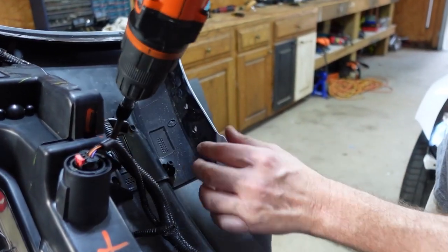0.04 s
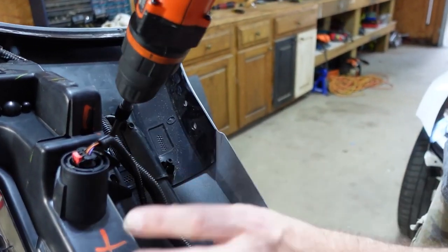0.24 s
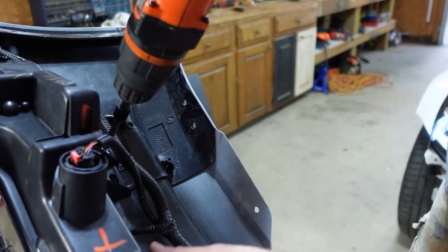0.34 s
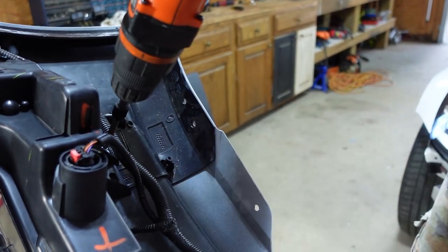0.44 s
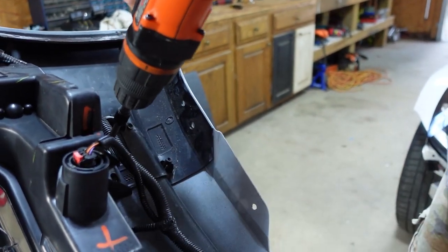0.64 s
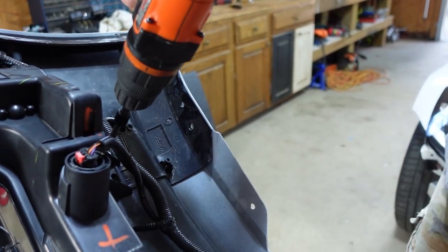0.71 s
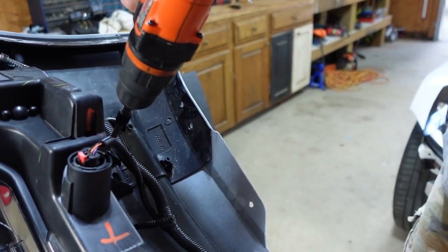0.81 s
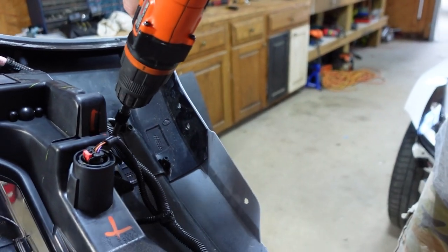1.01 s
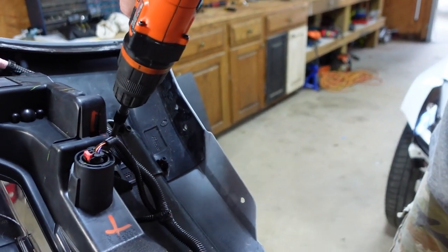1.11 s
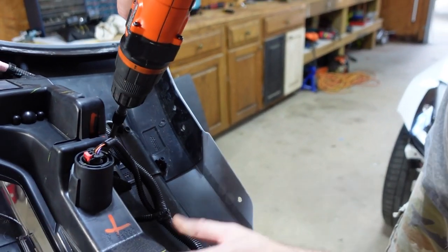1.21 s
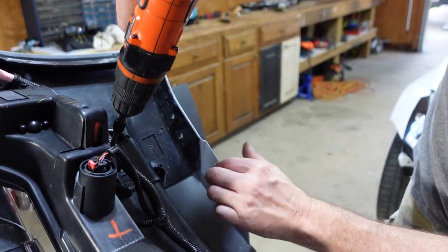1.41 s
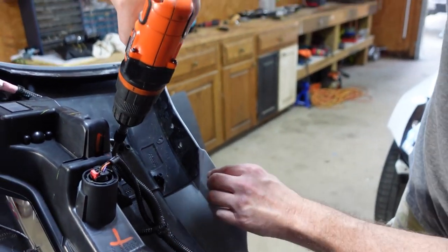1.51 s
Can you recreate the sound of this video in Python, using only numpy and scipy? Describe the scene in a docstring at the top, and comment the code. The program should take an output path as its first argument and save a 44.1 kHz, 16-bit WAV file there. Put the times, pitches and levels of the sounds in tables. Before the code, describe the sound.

A cordless drill whirs in three short bursts, close up in a garage and louder on the left. The bit clicks in the screw head, and a plastic panel knocks and groans as the screw tightens.

```python
"""A cordless drill drives a screw into a plastic fairing in three short trigger pulls.
Close up in a garage, much louder in the left channel, over faint room air. The gearbox rattles, the
brushes hiss, and the whine sweeps through a housing resonance as the motor spins up and brakes.
The bit clicks in the screw head, the panel knocks and groans as the screw tightens,
and a hand lands on it at the end."""
import sys
import numpy as np
from scipy import signal
from scipy.fft import rfft, irfft
from scipy.io import wavfile
from scipy.ndimage import uniform_filter1d

SR = 44100
rng = np.random.default_rng(int(sys.argv[2]) if len(sys.argv) > 2 else 0)


def log_audio(samples):
    """Write samples as a 16-bit WAV file to the path given in sys.argv[1]."""
    # one column per channel
    frames = np.atleast_2d(samples).T
    # limit to full scale, then quantise
    limited = np.clip(frames, -1, 1)
    pcm = np.round(limited * 32767).astype(np.int16)
    wavfile.write(sys.argv[1], SR, pcm)


N = 68355
T = np.arange(N) / SR


def undb(db):
    """Decibels to gain."""
    return 10 ** (np.asarray(db) / 20)


def unit(x):
    """Scale to rms 1."""
    return x / np.sqrt(np.mean(x ** 2) + 1e-18)


def colour(x, spectrum):
    """Minimum-phase filter of unit power gain, shaped by rows of f/Hz, level/dB."""
    hz, db = np.array(spectrum, float).T
    size = 4096
    log_hz = np.log(np.arange(size // 2 + 1) * SR / size + 1)
    gain = unit(undb(np.interp(log_hz, np.log(hz), db)))
    cepstrum = irfft(np.log(gain))
    cepstrum[1:size // 2] *= 2
    cepstrum[size // 2 + 1:] = 0
    return signal.fftconvolve(x, irfft(np.exp(rfft(cepstrum))))[:len(x)]


def resonate(x, hz, width_hz):
    """One resonance, gain 1 at its centre."""
    return signal.lfilter(*signal.iirpeak(hz, hz / width_hz, fs=SR), x)


def fade(start, t60):
    """Sudden onset and exponential decay."""
    return (T >= start) * np.exp(-np.log(1000) * np.maximum(T - start, 0) / t60)


def swells(rows):
    """Half-sine swells from rows of t/s, length/s, level/dB."""
    return sum(undb(db) * np.sin(np.pi * np.clip((T - start) / length, 0, 1))
               for start, length, db in rows)


def impacts(per_s, scatter_db):
    """Random tiny impacts of uneven size, rms 1."""
    hits = (rng.random(N) < per_s / SR) * np.sign(rng.standard_normal(N))
    return unit(hits * undb(scatter_db * rng.standard_normal(N)))


def room_air():
    """Faint, steady, low room tone."""
    # spectrum of the air: f/Hz, level/dB
    spectrum = [(25, -22), (80, -23.5), (150, 9.5), (250, 1.5), (550, 6), (900, -4.5), (3000, -14),
                (8000, -21.5), (16000, -33)]
    return undb(-57.5) * colour(rng.standard_normal(N), spectrum)


def garage(x):
    """Diffuse reverberation in octave bands; the lows last longest."""
    # reverberation bands: f/Hz, t60/s, level/dB
    bands = [(60, 1, -8), (129.3, 0.49, -25), (250, 0.52, -5.5), (504, 0.62, -11), (940, 0.66, -4),
             (2000, 0.56, -10), (4200, 0.62, -12.5), (7900, 0.36, -14.5), (13670, 0.44, -16.5)]
    build_s = 0.0051
    noise = rfft(rng.standard_normal(N))
    log_hz = np.log(np.arange(N // 2 + 1) * SR / N + 1)
    centres = np.log([row[0] for row in bands])
    tail = np.zeros(N)
    for share, (_, t60, db) in zip(np.eye(len(bands)), bands):
        band = irfft(noise * np.interp(log_hz, centres, share), N)
        envelope = fade(0, t60) * (1 - np.exp(-T / build_s))
        tail += undb(db) * band * envelope / np.linalg.norm(envelope)
    return signal.fftconvolve(x, tail)[:N]


def hand():
    """A hand brushes the plastic, faint and dry."""
    # touches: t/s, length/s, level/dB
    touches = [(.001, 0.019, -61), (1.178, 0.0054, -50.5), (1.215, 0.048, -57.5)]
    spectrum = [(500, -40), (3000, 9), (8000, 7), (16000, -19)]  # f/Hz, level/dB
    return colour(swells(touches) * rng.standard_normal(N), spectrum)


def controller():
    """The speed controller whistles thinly while the trigger is half pressed."""
    # whistles: t/s, length/s, level/dB
    whistles = [(.2, 0.1, -42), (.548, 0.025, -43), (.821, 0.018, -45)]
    switching_hz = 8170
    return swells(whistles) * np.sin(2 * np.pi * switching_hz * T)


def screw():
    """The thread sticks and slips in the plastic and makes the panel groan."""
    # bouts of slipping: t/s, length/s, level/dB
    groans = [(.255, 0.03, -27.5), (.745, 0.034, -37.5), (.858, 0.073, -22.5), (.934, 0.046, -21)]
    # spectrum of a groan: f/Hz, level/dB
    spectrum = [(25, -13), (60, -16.5), (95, -9.5), (135, 13), (200, -9.5), (350, 7), (600, -4), (900, -3),
                (1600, -25), (5000, -18.5), (16000, -40)]
    return colour(swells(groans) * impacts(per_s=900, scatter_db=3), spectrum)


def panel():
    """Each knock is a short push that rings the plastic panel's modes, with a dry crack on top."""
    # knocks: t/s, push level/dB, contact time/s, crack level/dB
    knocks = [(0.0955, -25.5, 0.0028, -44), (.262, -15, 0.0022, -21), (0.7442, -17, 0.0026, -17.5),
              (0.887, -21, 0.0023, -17), (.963, -22, 0.0015, -26.5), (1.3545, -28, 0.0013, -43)]
    # panel modes: f/Hz, level/dB, t60/s
    modes = [(143, -16.5, 0.23), (230, -14, 0.078), (294, -9.5, 0.088), (360, 0, 0.061), (399.2, -9, 0.35),
             (455, 6, 0.054), (625.5, -12.5, 0.21), (654, -11.5, 0.23), (860, -11, .03), (1300, -17, 0.012)]
    # spectrum of a crack: f/Hz, level/dB
    crack_spectrum = [(100, -20), (500, 0), (1300, 1.5), (1900, -17.5), (4000, -13.5), (16000, -72)]
    low_cut_hz = 98
    push, crack = np.zeros(N), np.zeros(N)
    for start, push_db, contact_s, crack_db in knocks:
        pulse = np.sin(np.pi * np.clip((T - start) / contact_s, 0, 1)) ** 2
        push += undb(push_db) * pulse / pulse.sum()
        crack += undb(crack_db) * rng.standard_normal(N) * fade(start, t60=0.029)
    ring = sum(undb(db) * np.cos(2 * np.pi * hz * T) * fade(0, t60) for hz, db, t60 in modes)
    radiated = signal.sosfilt(signal.butter(2, low_cut_hz, "high", fs=SR, output="sos"), ring)
    return signal.fftconvolve(push, radiated)[:N] + colour(crack, crack_spectrum)


def bit():
    """The steel bit clicks in the screw head: a broad tick and a brief ring."""
    # clicks: t/s, tick level/dB, ring level/dB, ring f/Hz
    clicks = [(0.036, -33, -28.5, 7200), (.096, -37, -44, 3100), (0.201, -38, -52, 3000),
              (0.208, -30, -44, 8300), (.212, -21.5, -9, 2300), (0.518, -31, -26, 2560),
              (0.7429, -48, -12.5, 5100), (.761, -37, -25, 6860), (0.762, -22, -15, 5080),
              (.780, -23, -42, 5530), (0.7875, -30.5, -21, 5570), (0.8875, -15.5, -5.5, 4200),
              (0.9039, -19, -5, 7400), (0.9805, -26.5, -7.5, 7140), (0.9943, -22.5, -0.5, 6540),
              (1.008, -30, -8.5, 7640), (1.0102, -44, -23, 7300), (1.354, -34.5, -33, 6650)]
    # spectrum of a tick: f/Hz, level/dB
    tick_spectrum = [(200, -35), (1200, -6.5), (2200, 5.5), (5000, 3), (8000, -2), (11000, -11.5),
                     (16000, -22.5)]
    ticks, rings = np.zeros(N), np.zeros(N)
    for start, tick_db, ring_db, hz in clicks:
        contact = np.sign(rng.standard_normal(N)) * fade(start, t60=0.016)
        ticks += undb(tick_db) * contact
        broad_ring = resonate(contact, hz, width_hz=2080)
        rings += undb(ring_db) * resonate(broad_ring, hz, width_hz=1040)
    return colour(ticks, tick_spectrum) + rings


def drill():
    """Gears rattle harder under torque, brushes hiss with speed, the whine rings the housing."""
    # motor speed through the three pulls: t/s, rotation f/Hz
    speed_curve = [(.203, 0), (.216, 137), (.238, 221.5), (.256, 263), (.28, 294), (.31, 303),
                   (.336, 300.5), (.346, 285.5), (.357, 214.5), (.378, 130), (.39, 0), (.551, 0),
                   (.558, 134.5), (.571, 207), (.586, 294.5), (.61, 303.5), (.655, 304), (.670, 290),
                   (.683, 209), (.692, 126), (.70, 0), (.825, 1.5), (.832, 159.5), (.843, 220.5),
                   (.857, 298), (.89, 301.5), (.955, 303.5), (.984, 268.5), (.995, 212), (1.02, 143.5),
                   (1.04, 2)]
    # trigger pulls: t/s, rattle level/dB, brush and fan hiss level/dB, whine level/dB
    pulls = [(.19, -30, -26.5, -20.5), (.54, -24.5, -24.5, -18), (.81, -23, -25, -17)]
    # gear mesh tones: multiple of motor speed, level/dB re the tooth impacts at full speed
    mesh_tones = [(1, -16.5), (2, -33), (7, -19), (8, -17.5), (12, -17.5), (14, -33.5), (18, -14.5),
                  (24, -33), (35, -19)]
    # spectrum of the tooth impacts: f/Hz, level/dB
    gear_spectrum = [(60, -35), (150, -11.5), (230, -7.5), (330, 3), (430, -6), (600, 7), (780, -0.5),
                     (1100, -1.5), (1800, -1.5), (2550, 3), (3100, -1.5), (3700, -9), (5300, -11),
                     (8000, -29), (16000, -30)]
    # spectrum of the brushes and fan: f/Hz, level/dB
    hiss_spectrum = [(200, -41), (1500, -10.5), (3000, -2.5), (4500, -3), (5300, 3), (6200, -2), (7400, 4),
                     (8300, -5.5), (9200, -6), (10700, -6.5), (11700, -11), (12800, -8), (14400, -15),
                     (16000, -24)]
    full_speed_hz, speed_jitter, torque_knee_hz_per_s = 303, 0.0208, 2150
    housing_hz, housing_width_hz = 519, 234

    pulls = np.array(pulls)
    current_pull = np.maximum(np.searchsorted(pulls[:, 0], T) - 1, 0)
    rattle_gain, hiss_gain, whine_gain = undb(pulls[current_pull, 1:]).T

    speed = np.interp(T, *np.array(speed_curve).T)
    pace = speed / full_speed_hz
    wobble = unit(uniform_filter1d(rng.standard_normal(N), size=120))
    angle = 2 * np.pi * np.cumsum(speed * (1 + speed_jitter * wobble)) / SR
    acceleration = uniform_filter1d(np.abs(np.gradient(speed)) * SR, size=400)
    torque = np.tanh(acceleration / torque_knee_hz_per_s)  # high in both spin-up and braking
    per_turn = 1 + 0.22 * np.cos(angle)  # teeth and hiss pulse once a turn

    teeth = colour(impacts(per_s=9000, scatter_db=5) * per_turn, gear_spectrum)
    mesh = sum(undb(db) * np.sin(order * angle) for order, db in mesh_tones) * np.sqrt(2 * pace)
    rattle = (teeth + mesh) * rattle_gain * pace ** 1.45 * (1 + 0.75 * torque)
    hiss = colour(rng.standard_normal(N) * per_turn, hiss_spectrum) * hiss_gain * pace ** 3.64
    whine = np.sqrt(2) * np.sin(2 * angle) * whine_gain * torque * pace ** 2
    for _ in range(2):  # two passes steepen the resonance
        whine = resonate(whine, housing_hz, housing_width_hz)
    return rattle + hiss + whine


def scene():
    """The work close to the microphone, the garage around it, the left channel 20 dB up."""
    left_db, right_db = 5, -15
    near = drill() + controller() + bit() + panel() + screw() + hand()
    air = room_air()
    return (near + garage(near) + air) * undb([[left_db], [right_db]])


def record(dry):
    """The recorder cuts the top steeply."""
    top_hz = 16000
    return signal.sosfilt(signal.ellip(10, .2, 80, top_hz, fs=SR, output="sos"), dry)


dry = scene()
out = record(dry)
log_audio(out)
```